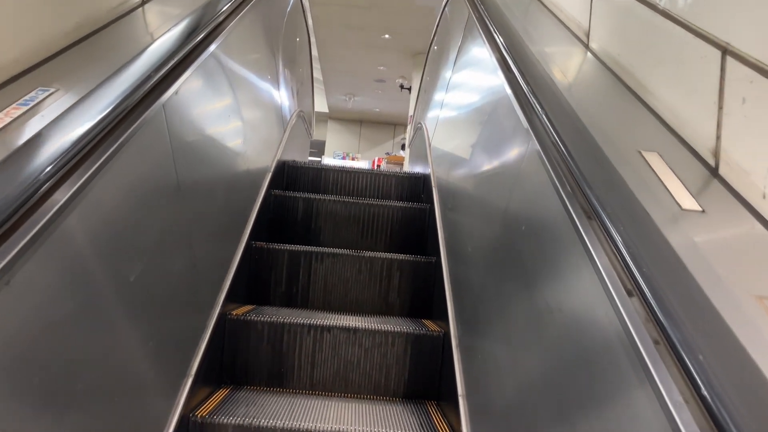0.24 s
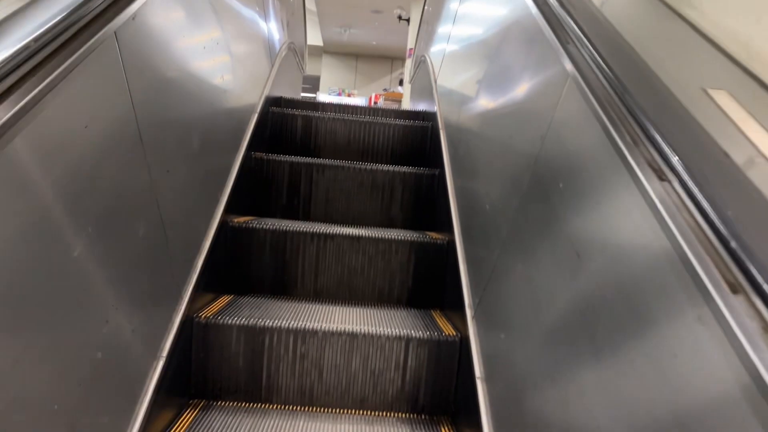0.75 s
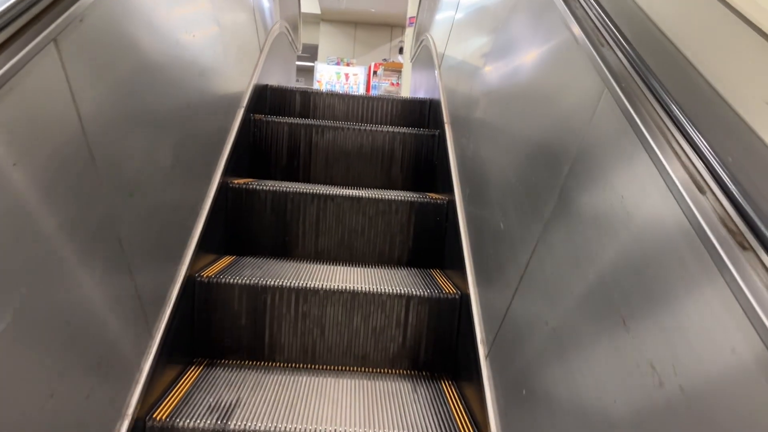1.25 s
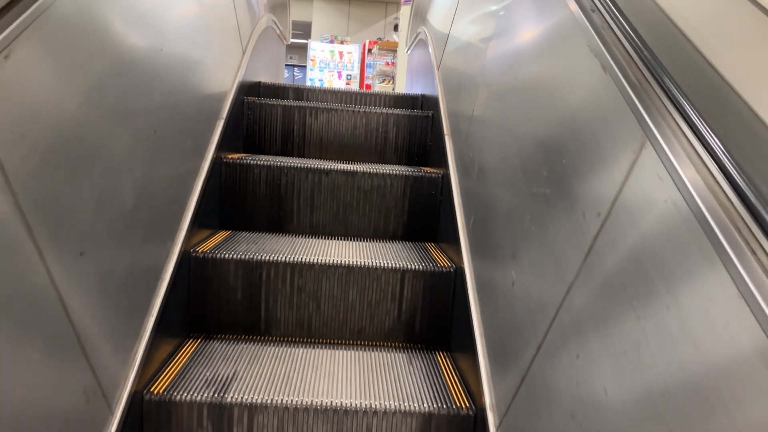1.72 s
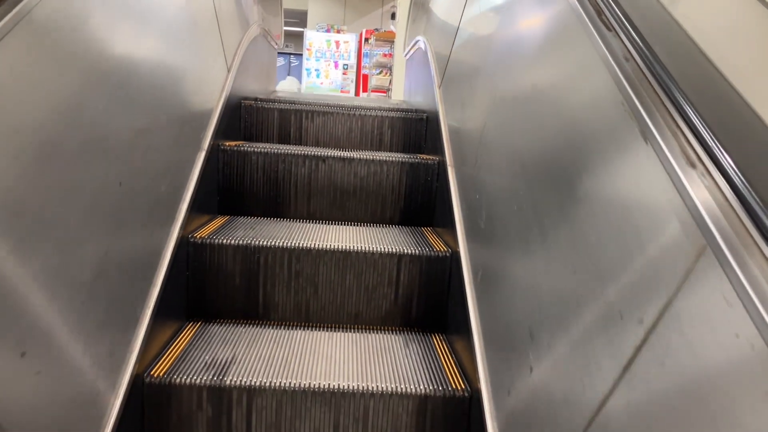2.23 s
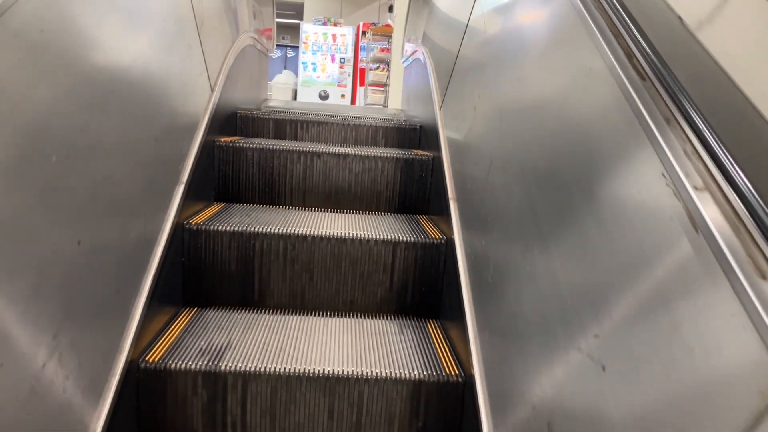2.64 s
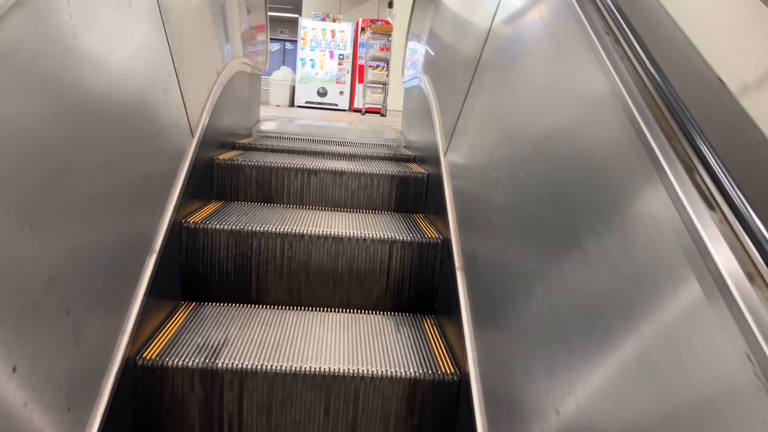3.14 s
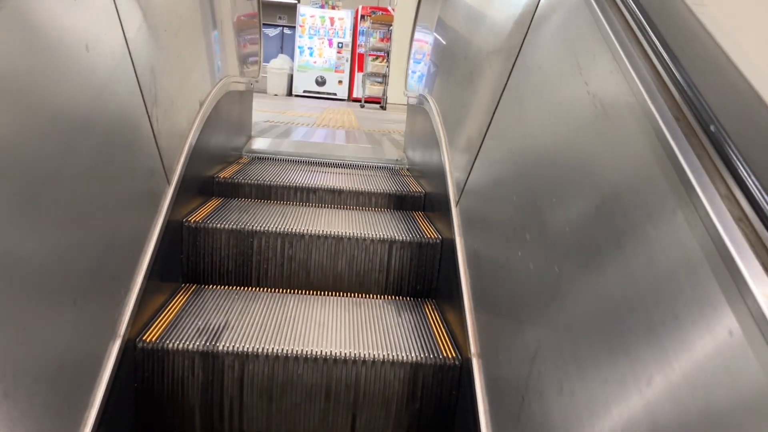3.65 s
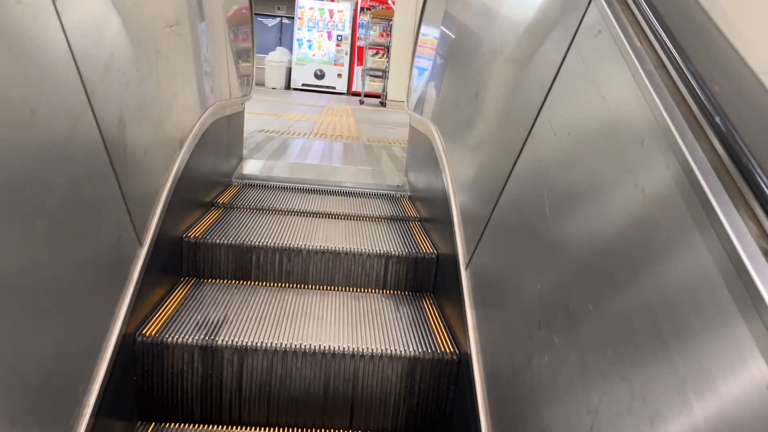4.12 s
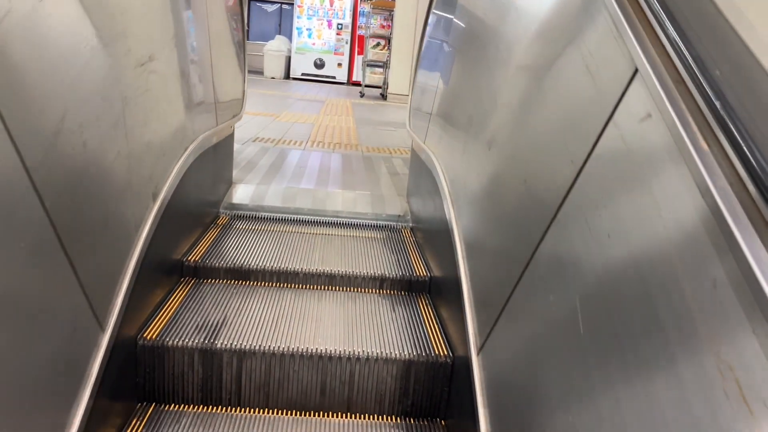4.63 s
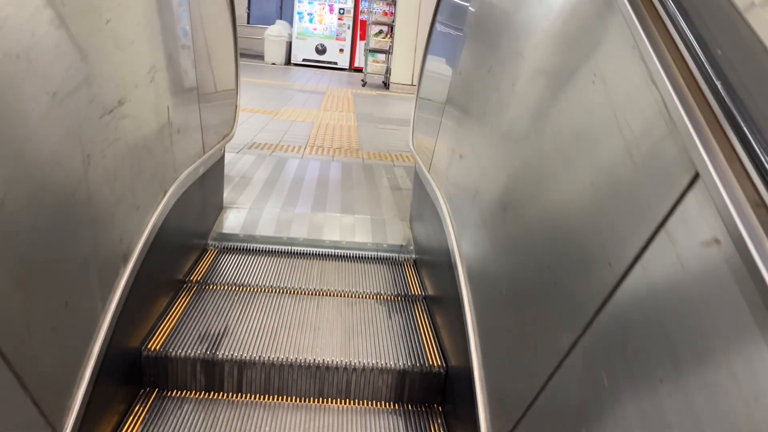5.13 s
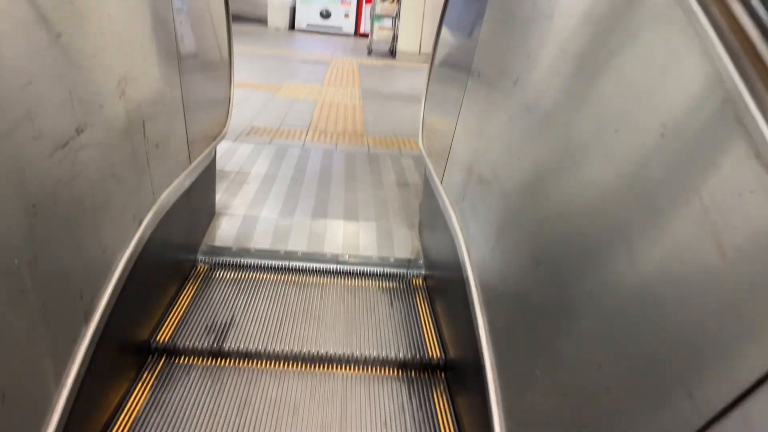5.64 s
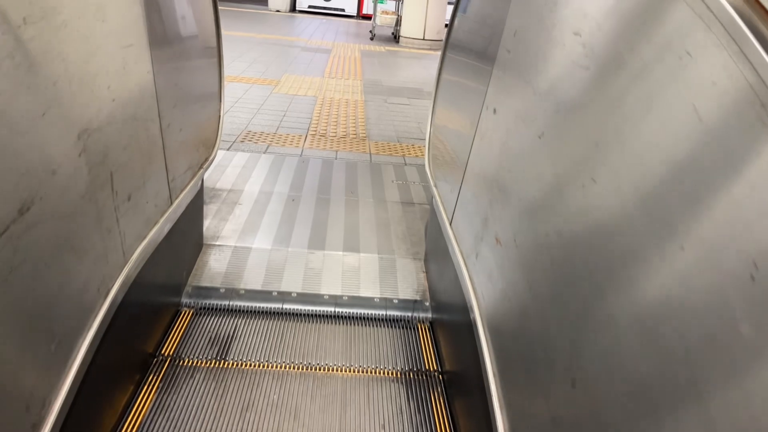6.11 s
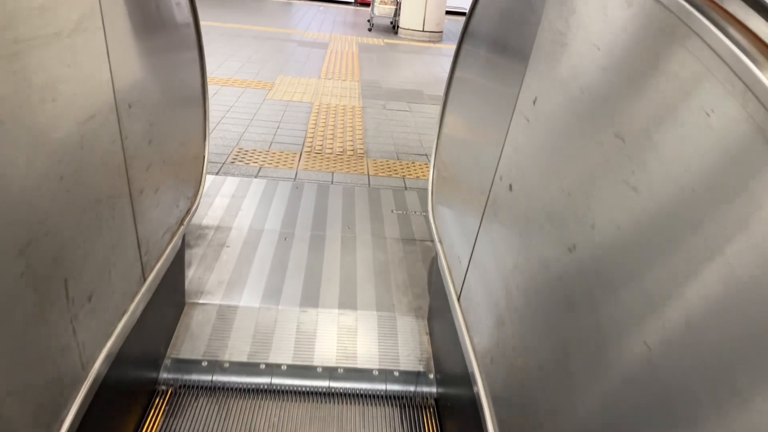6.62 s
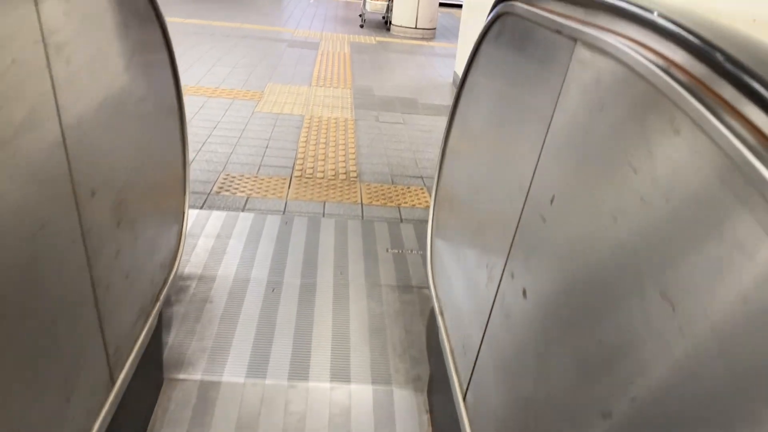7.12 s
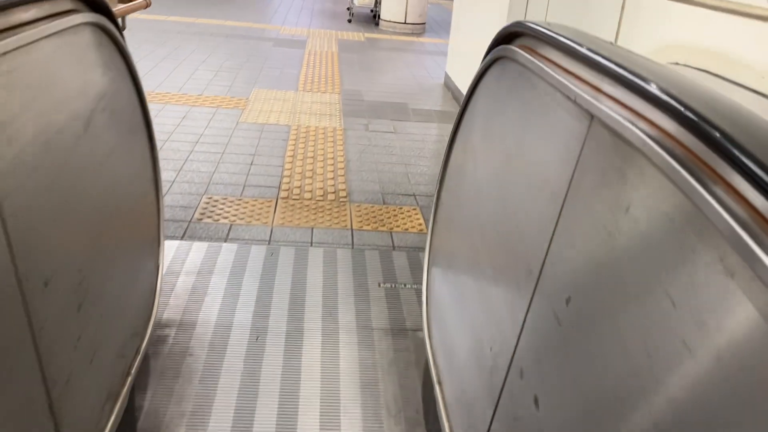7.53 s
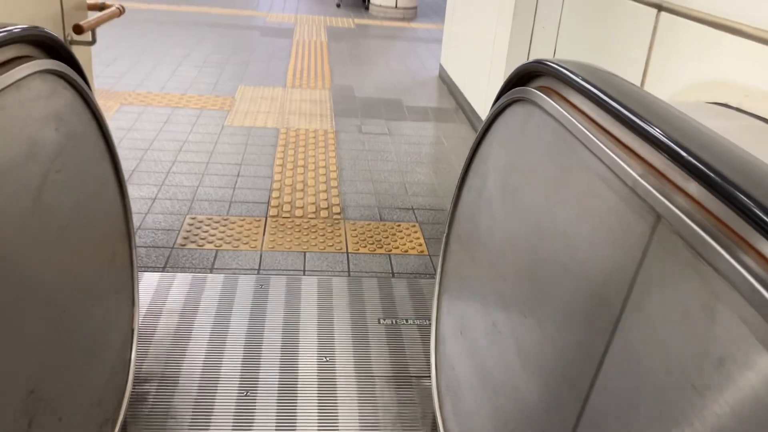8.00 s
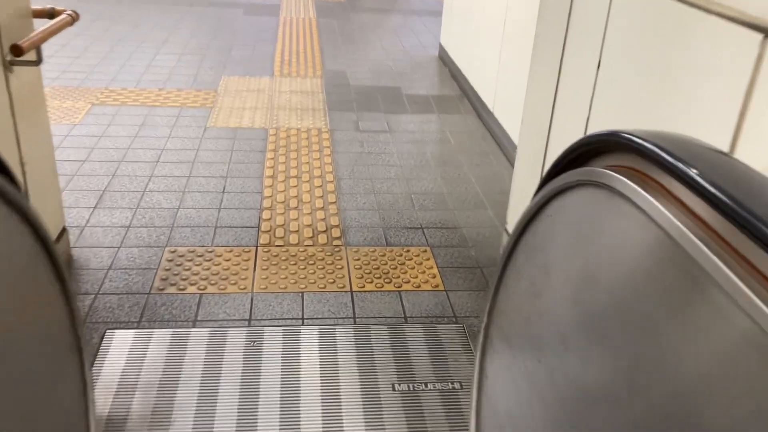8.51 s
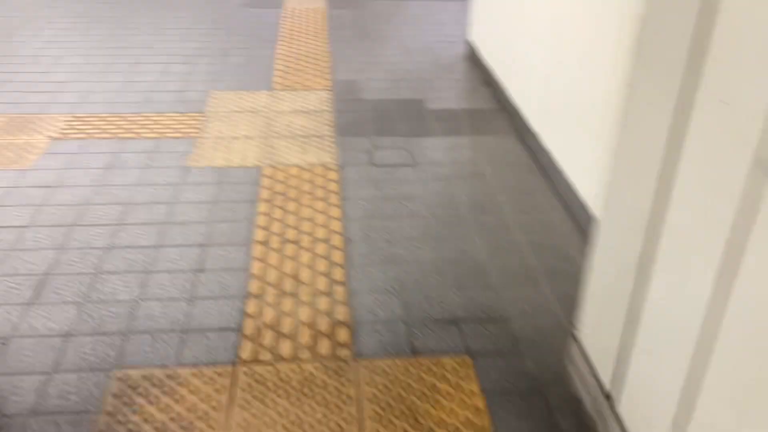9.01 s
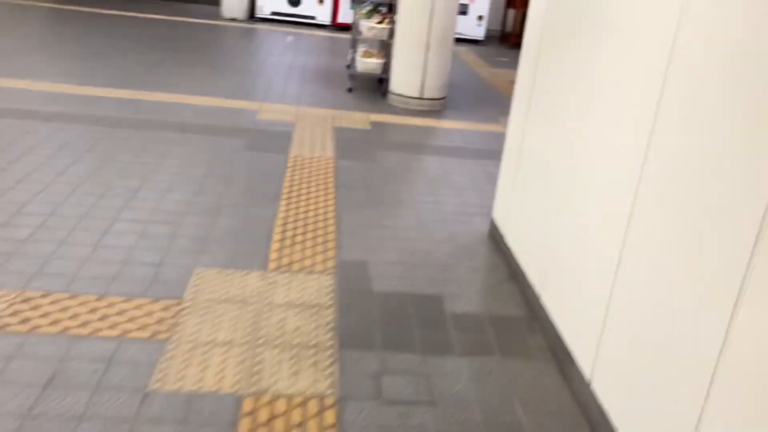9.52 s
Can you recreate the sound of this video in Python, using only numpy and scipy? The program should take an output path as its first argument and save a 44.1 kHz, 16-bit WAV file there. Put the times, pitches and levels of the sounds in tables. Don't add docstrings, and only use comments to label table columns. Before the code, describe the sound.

A close stereo microphone at chest height rides a steel escalator toward a tiled hall for nearly ten seconds. A deep roller rumble runs throughout, swelling gently every 0.85 seconds, with quick faint chain ticks about seven per second and a soft handrail hiss. A hollow knock opens at 0.2, followed by lighter knocks. From about 2.1 the ticks sharpen; at 2.8 and 3.6 steps fold with booms and clacks, while the motor roar and high gear whine draw nearer. A hard metallic clack lands at 5.3. Heavy hollow booms follow at 6.2, with a dry snap, then 7.0 and 7.9, the loudest. Cloth rustles around 8.5, a sole drags, and a gritty scuff rings the plate at 8.75. Smaller scrapes and taps follow at 9.2 to 9.3, as the machinery eases slightly. Short metallic reflections surround the blows.

```python
import sys
import numpy as np
from scipy import signal
from scipy.fft import rfft, irfft
from scipy.io import wavfile
from scipy.ndimage import uniform_filter1d

SR = 44100
rng = np.random.default_rng(int(sys.argv[2]) if len(sys.argv) > 2 else 0)


def linear_from_db(decibels):
    return 10 ** (np.asarray(decibels, float) / 20)


def generate_wav(sig):
    pcm = np.round(np.clip(np.atleast_2d(sig).T, -1, 1) * 32767).astype(np.int16)
    wavfile.write(sys.argv[1], SR, pcm)


N = 429975
STEP_S = .8483
KNOCK_T60, SOFT_KNOCK_HZ = 0.23, 245.4


def evened(x):
    return x / np.sqrt(np.mean(x ** 2) + 1e-20)


def read(points, hz):
    f, value = np.transpose(points)
    return np.interp(np.log(hz + 1), np.log(f + 1), value)


def add(mix, s, sound):
    part = mix[:, round(s * SR):][:, :sound.shape[1]]
    part += sound[:, :part.shape[1]]


def bump(t, centre_s, wide_s):
    return np.exp(-((t - centre_s) / wide_s) ** 2)


def strike(hz, t60, rise_s, octaves, tilt_db, bounce, count):
    t = np.arange(int((.8 * t60 + .03) * SR)) / SR
    place, life, *turn = rng.uniform(-1.05, 1, (4, count, 1))
    if count > 9:
        place = np.linspace(-1, 1, count)[:, None] + place / count
    place = octaves * place * (np.arange(count)[:, None] > 0)
    mode_t60 = t60 * (1 + 0.49 * life) / 2 ** (.5 * place)
    decay = linear_from_db(tilt_db * place) * np.exp(-np.log(1000) * t / mode_t60)
    phase = 2 * np.pi * (hz * 2 ** place * t + .5 * np.array(turn))
    ring = (decay * np.sin(phase)).sum(1)
    fade = signal.windows.tukey(2 * len(t), .3)[len(t):]
    ring = ring * (1 - np.exp(-t / rise_s)) * fade
    late = int(rng.uniform(.006, .014) * SR)
    ring[:, late:] += bounce * ring[:, :-late]
    return ring / abs(ring).max(axis=1, keepdims=True)


def bed(shape, level_db, size, patchy_db, flicker_db):
    # centre in Hz, width in Hz, lift in dB.
    truss = [(57.7, 15.2, 15), (99, 12.5, 7.5), (118, 8.4, -1.5), (140, 40, 1), (226, 37.4, 10.5),
             (256.6, 15, 4), (293.3, 25, 7.5), (330.4, 11, 4), (383, 30, 6), (464, 35, 8.5), (860, 23, 3),
             (1368, 22, 0.5), (2010, 25, 2), (1680, 20, 1)]
    hop = size // 4
    frames, hz = N // hop + 5, np.fft.rfftfreq(size, 1 / SR)
    z = rng.standard_normal((frames, len(hz), 5), dtype=np.float32).T
    patches = evened(uniform_filter1d(uniform_filter1d(z[4], 6, 0), 6, 1))
    flicker = evened(uniform_filter1d(rng.standard_normal(frames), 5))
    rings_db = sum(db / (1 + (2 * (hz - f) / width) ** 2) for f, width, db in truss)
    steady_db = (read(shape, hz) + rings_db)[:, None]
    colour = linear_from_db(steady_db + patchy_db * patches + flicker_db * flicker)
    spectrum = (z[:2] + 1j * z[2:4]) * colour
    noise = signal.istft(spectrum, nperseg=size, noverlap=size - hop)[1][:, :N]
    return evened(noise) * linear_from_db(level_db)


def rollers(t, far, leave_db):
    # frequency in Hz, level in dB per Hz.
    rumble = [(12, -40), (20, -18), (64, -5.5), (112, 0), (147, 2), (186, -10), (243, -10), (323, -10),
              (512, -20.5), (700, -16), (910, -54), (1540, -120)]
    swell_db = 1.5 * np.cos(2 * np.pi * (t - 0.49) / STEP_S)
    level_db = -31.5 + swell_db - 0.25 * far + 0.35 * leave_db
    return bed(rumble, level_db, size=4096, patchy_db=2.0, flicker_db=-1.34)


def steps():
    # start in seconds, boom peak in dB, boom in Hz, knock peak in dB, knock in Hz.
    folds = [
        (0.232, -38, 110, -18.5, 223.8),
        (2.775, -24, 112, -18.5, 187.8),
        (3.63, -20, 105, -20, 222.6),
        (4.53, -38, 110, -24.5, 271),
        (5.326, -20.5, 140, -22.5, 317.4),
        (6.163, -11.5, 138.4, -18, 226),
        (7.023, -11, 122, -21, 184),
        (7.854, -9.5, 127, -14, 235.5),
        (8.727, -12.5, 131, -25, 240),
        (9.534, -40, 109, -27.5, 259.5),
    ]
    # start in seconds, peak in dB, pitch in Hz.
    landings = [(0.921, -25, 99), (1.62, -23, 100), (2.206, -23, 102), (2.721, -25, 111.7),
                (2.978, -28, 73), (3.144, -24, 139), (3.818, -23.5, 153), (4.24, -35, 119),
                (4.845, -22, 102.6), (5.664, -24, 74.5), (5.827, -22, 91.5), (6.355, -25, 117),
                (6.7, -17.5, 94), (6.926, -16.5, 106), (7.36, -17, 93), (7.636, -18.5, 119),
                (8.07, -21.5, 106), (8.234, -15, 166), (8.925, -18, 115)]
    # start in seconds, peak in dB, pitch in Hz.
    settlings = [(0.602, -28.5, 434), (1.418, -25.5, 231.5), (1.822, -30.5, 321), (1.984, -27, 230),
                 (2.252, -24, 239), (2.906, -31, 226), (2.993, -24, 289.4), (3.515, -27.5, 288.6),
                 (3.98, -31, 278), (4.875, -32.5, 230), (5.242, -25.5, 363), (5.52, -27, 226),
                 (5.624, -22.5, 300), (6.467, -28, 278), (6.48, -20.5, 271.6), (6.515, -23, 339),
                 (6.786, -27.5, 397), (6.927, -26, 269), (7.017, -17.5, 397.4), (7.145, -28.5, 216),
                 (7.361, -26, 231.5), (8.811, -24, 229), (7.636, -20.5, 269.4), (7.821, -25, 298),
                 (8.067, -26, 360.4), (8.207, -20.5, 279), (8.348, -29, 220.4), (8.912, -23.5, 396),
                 (9.028, -23, 325), (9.614, -28.5, 292)]
    knock_late_s = 0.00796
    out = np.zeros((2, N))
    booms = [(s, db, hz, 0.13) for s, db, hz, _, _ in folds]
    booms += [(s, db, hz, 0.16) for s, db, hz in landings]
    knocks = [(s + knock_late_s, db, hz, 0.28) for s, _, _, db, hz in folds]
    knocks += [(s, db, hz, KNOCK_T60 * SOFT_KNOCK_HZ / hz) for s, db, hz in settlings]
    for s, db, hz, t60 in booms:
        add(out, s, linear_from_db(db - 5.0) * strike(hz, t60, 0.0015, 0.324, 0, 0, count=3))
    for s, db, hz, t60 in knocks:
        add(out, s, linear_from_db(db) * strike(1.08 * hz, t60, 0.00064, 0.329, -5.5, 0.44, count=10))
    return out


def clacks():
    # start in seconds, peak in dB, tilt in dB per octave, t60 in seconds.
    blows = [(0.243, -25, -4, 0.073), (2.772, -22, -3.5, 0.18), (3.64, -24, -8, 0.047),
             (5.326, -15, -6, 0.071), (6.163, -22.5, -4, 0.14), (7.027, -15, -2.5, 0.046),
             (7.854, -21, -13, 0.58), (8.067, -27, -9, 0.028), (8.207, -37, -1, 0.07),
             (8.727, -19.5, -8.5, 0.081), (8.786, -29, -2, 0.034), (8.912, -35, -27, 0.048),
             (9.24, -32.5, -2, 0.22)]
    out = np.zeros((2, N))
    dull = signal.butter(3, 1900, fs=SR, output="sos")
    for s, db, tilt_db, t60 in blows:
        blow = strike(950, 1.12 * t60, 0.0011, 1.75, tilt_db, 0.78, count=30)
        add(out, s, linear_from_db(db) * signal.sosfilt(dull, blow))
    return out


def side_panel():
    # start in seconds, peak in dB, pitch in Hz, t60 in seconds.
    tones = [
        (6.105, -43, 865, .3),
        (6.71, -41, 860, .35),
    ]
    out = np.zeros((2, N))
    for s, db, hz, t60 in tones:
        add(out, s, linear_from_db(db) * strike(hz, t60, .012, 0.025, 0, 0, count=2))
    return out


def chain():
    # start in seconds, peak in dB, pitch in Hz, ring in dB.
    links = [(0.436, -32, 1220, -7), (0.561, -32, 1080, -5), (1.968, -36, 970, -7), (2.125, -24.5, 860, -5),
             (2.275, -32, 920, -6), (2.687, -30, 930, -6), (2.973, -29, 882, -8), (3.125, -31, 970, -3),
             (3.258, -31.5, 890, -6), (3.404, -25.5, 933, 4), (3.54, -26, 908, -13), (3.828, -33, 900, -14),
             (3.966, -26.5, 950, -10), (4.109, -30, 912, -8), (4.255, -27.5, 1250, -7),
             (4.393, -30.5, 1130, -5), (4.532, -27, 917, -12), (4.675, -27, 956, -1.5),
             (4.818, -29.5, 940, -6), (5.103, -30, 996, -5), (5.521, -25, 900, -1.5), (5.674, -30, 900, -4),
             (6.364, -29.5, 1150, -1), (6.511, -30.5, 890, -2), (6.642, -30.5, 985, -3),
             (6.918, -29, 1050, -3), (7.215, -29.5, 1186, -2.5), (7.356, -27.5, 1147, -5),
             (8.061, -37, 950, -7), (9.061, -28.5, 860, -4)]
    # start in seconds, peak in dB, pitch in Hz, rattle in dB.
    loose_taps = [(0.069, -35, 1120, -10), (1.073, -36, 1104, -17), (1.497, -32, 920, -20),
                  (1.774, -38, 930, -8), (1.816, -28.5, 1105, -4), (2.012, -31, 975, -5),
                  (2.915, -33, 1440, -13), (3.51, -31, 1000, -2), (3.741, -34, 1346, -4),
                  (4.472, -30, 916, -15), (5.327, -22, 1023, -15), (6.078, -32, 940, 3.5),
                  (6.162, -26.5, 904, 1), (6.47, -34, 926, -2), (6.688, -29.5, 992, -18),
                  (7.019, -26, 863, -15), (7.762, -35, 990, -9), (8.042, -33, 1030, -3),
                  (8.786, -27.5, 730, -1), (8.837, -33.5, 767, -2), (9.026, -34, 880, 1.5),
                  (9.24, -30, 764, -14), (9.292, -37, 1210, -2), (9.727, -34, 597, -17)]
    gap, link_at_s = STEP_S / 6, 2.13
    link_t60, rattle_db, tap_ring_db = 0.08, -7.5, -5.5
    out, rings = np.zeros((2, 2, N))
    hard = np.array(links)[:, 0]
    soft = [s for s in np.arange(link_at_s % gap, N / SR, gap) if abs(hard - s).min() > gap / 3]
    rows = [(*row, rattle_db) for row in links]
    rows += [(s, db, hz, tap_ring_db, upper_db) for s, db, hz, upper_db in loose_taps]
    for s, (a, b, c) in zip(soft, rng.uniform(-0.975, 1, (len(soft), 3))):
        rows.append((s + .005 * a, -36.5 + 3.5 * b, 957 * (1 + 0.14 * c), tap_ring_db, rattle_db))
        knock = strike(SOFT_KNOCK_HZ, KNOCK_T60, 0.0014, 0.472, 0, 0.51, count=6)
        add(out, s, linear_from_db(-37 + 3.7 * a) * knock)
    for s, db, hz, ring_db, upper_db in rows:
        ring = strike(hz, 0.8 * link_t60, 0.001, .22, 0, 0.3, count=2)
        tick = strike(946, 0.6 * link_t60, 0.0011, 0.711, 0, 0.62, count=10)
        rattle = strike(1653, 0.57 * link_t60, 0.0011, 0.31, 0, 0.45, count=5)
        add(rings, s, linear_from_db(db + ring_db) * ring)
        add(out, s, linear_from_db(db - 2.5) * tick)
        add(out, s, linear_from_db(db + upper_db - 3.5) * rattle)
    return out, rings


def shoes():
    # start in seconds, peak in dB, bright part in dB.
    scuffs = [(0.7456, -41.5, -5), (1.815, -44, -18), (2.5526, -44, -12), (2.782, -41, 0),
              (2.7994, -38.5, -10), (5.0754, -43, -16), (5.3303, -44, 2), (7.0304, -42, -5),
              (7.5911, -51, -19), (8.745, -28.5, -6.5), (9.061, -43.5, -4), (9.2399, -40, -18),
              (9.258, -42, 0), (9.289, -41, -9), (9.4884, -51, 3), (9.5213, -44, -12), (9.6106, -46, -22)]
    # start in seconds, peak in dB, pitch in Hz, t60 in seconds.
    plate = [(2.782, -33, 1870, 0.1), (2.782, -35.5, 4500, .09), (2.783, -32, 7100, 0.13),
             (8.7448, -27, 4450, 0.027), (8.7455, -34, 5900, .05), (8.787, -31.5, 2100, .04),
             (8.787, -36, 5500, 0.027), (9.24, -38, 3360, .04), (9.258, -40, 2300, 0.04),
             (9.292, -37, 2300, .035), (9.2914, -40, 4300, .04), (6.163, -34, 2180, 0.064),
             (5.33, -35, 2600, 0.098), (7.03, -37, 2900, 0.05)]
    # start in seconds, peak in dB, t60 in seconds, lowest Hz.
    snaps = [(6.162, -22, 0.0069, 11000),
                                                                                                      (8.7869, -29.5, 0.031, 4500),
                                                                                                      (8.4455, -40, .05, 9000),
                                                                                                      (8.8785, -45, .05, 9500),
                                                                                                      (9.2405, -43, 0.037, 6000),
                                                                                                      (9.2577, -45, 0.06, 9500),
                                                                                                      (9.2756, -42, 0.08, 9500),
                                                                                                      (9.2914, -43, .05, 7000)]
    # start in seconds, peak in dB, pitch in Hz.
    thuds = [(0.24, -27, 63), (0.58, -27.5, 70), (2.86, -26, 55), (4.42, -26, 65.4), (5.35, -32, 59.6),
             (9.38, -28, 68.3)]
    out, t = np.zeros((2, N)), np.arange(int(.12 * SR)) / SR
    dull = signal.butter(2, [1800, 5200], "bandpass", fs=SR, output="sos")
    bright = signal.butter(3, [5500, 9500], "bandpass", fs=SR, output="sos")
    rise = 1 - np.exp(-t / 0.00086)
    for s, db, top_db in scuffs:
        grit = rng.standard_normal((2, len(t)))
        tone = evened(signal.sosfilt(dull, grit)) + linear_from_db(top_db) * evened(signal.sosfilt(bright, grit))
        add(out, s, tone * linear_from_db(db - 60 * t / 0.065) * rise)
    for s, db, hz, t60 in plate:
        add(out, s, linear_from_db(db) * strike(hz, 0.81 * t60, 0.00018, .42, 0, 0.25, count=11))
    for s, db, t60, low_hz in snaps:
        thin = signal.butter(3, low_hz, "highpass", fs=SR, output="sos")
        snap = evened(signal.sosfilt(thin, rng.standard_normal((2, len(t)))))
        add(out, s, snap * linear_from_db(db - 60 * t / t60) * rise)
    for s, db, hz in thuds:
        add(out, s, linear_from_db(db) * strike(hz, 0.22, 0.014, 0.31, 0, 0, count=3))
    return out


def comb_teeth():
    # start in seconds, peak in dB, pitch in Hz, t60 in seconds.
    tooth_rings = [(5.327, -19, 1170, 0.031), (5.333, -42, 3200, .05), (5.35, -42, 3500, .03),
                   (8.788, -25.5, 830, 0.022), (9.241, -41, 3250, .05), (9.257, -35, 2070, .04),
                   (9.283, -33, 2400, .04), (9.291, -28.5, 1880, .045), (9.291, -40, 4600, .03),
                   (3.541, -34, 1600, .04), (5.336, -24, 680, 0.054), (5.342, -30, 1250, .04),
                   (7.592, -41, 3000, .03), (9.728, -35, 670, .04), (9.241, -32, 750, 0.054),
                   (9.292, -34.5, 1100, .03), (3.405, -30, 900, .09), (4.678, -30.5, 950, .09),
                   (3.97, -30.5, 680, 0.081), (6.165, -31, 1500, .09), (6.175, -34, 1900, .09),
                   (2.785, -30, 1900, 0.14), (5.345, -27.5, 478, .07)]
    out = np.zeros((2, N))
    for s, db, hz, t60 in tooth_rings:
        add(out, s, linear_from_db(db) * strike(hz, t60, 0.0008, .14, 0, .15, count=3))
    return out


def drive(t, far, leave_db, drag):
    # frequency in Hz, level in dB per Hz.
    roar = [(240, -50), (400, -22), (521, -8.5), (1240, -6.5), (1390, -7), (2060, -11), (2460, -15),
            (2770, -16), (5000, -27), (6500, -47), (11000, -120)]
    # frequency in Hz, level in dB.
    whine = [(2000, -60), (2550, -14), (2770, 0), (3000, -14), (3250, -22), (3480, -6), (3700, -22),
             (4500, -60)]
    shade = bump(t, 9, 0.12)
    roar_db = -43 - 1.1 * far + leave_db - 0.5 * drag - 2.5 * shade
    whine_db = -53 - 38 * far + 2 * leave_db
    out = bed(roar, roar_db, size=1024, patchy_db=1.5, flicker_db=0.57)
    return out + bed(whine, whine_db, size=1024, patchy_db=2.8, flicker_db=1.6)


def handrail(t, drag):
    # frequency in Hz, level in dB per Hz.
    hiss = [(2500, -20), (4000, -9.5), (6000, -6), (9000, -8), (12000, -10.5), (13500, -16), (14500, -15),
            (15600, -20), (15800, -45)]
    off_bend = 1 - bump(t, 4.87, 2.65)
    rub_db = -53.5 - 3.5 * off_bend + 5 * drag
    return bed(hiss, rub_db, size=512, patchy_db=2.0, flicker_db=0.45)


def cloth():
    # centre in seconds, rms in dB, half length in seconds.
    rustles = [(0.75, -60, .02), (3.84, -62, .015), (3.87, -65, .015), (3.915, -64, .015),
               (3.965, -51, .018), (4.15, -66, .03), (8.5, -55, .06), (8.62, -62, .07), (8.9, -62, 0.035)]
    t = np.arange(N) / SR
    high = signal.butter(4, 9800, "highpass", fs=SR, output="sos")
    puffs = sum(linear_from_db(db) * bump(t, s, half_s) for s, db, half_s in rustles)
    return puffs * evened(signal.sosfilt(high, rng.standard_normal((2, N))))


def hall(x):
    # frequency in Hz, t60 in seconds.
    decay = [(80, 0.73), (250, 0.35), (1000, 0.3), (4000, 0.26), (12000, 0.027)]
    taps = np.zeros((2, SR // 2))
    slots = np.arange(200, SR // 2 - 20, 20)
    at = slots + rng.integers(0, 20, (2, len(slots)))
    np.put_along_axis(taps, at, rng.choice([-1., 1.], at.shape), 1)
    hz, t, z = signal.stft(taps, SR, nperseg=512)
    fall = linear_from_db(-60 * t / read(decay, hz)[:, None])
    tail = signal.istft(z * fall, SR, nperseg=512)[1]
    return signal.fftconvolve(x[None], tail / np.linalg.norm(tail[0]), axes=1)[:, :N]


def ports(pair, treble_likeness):
    # frequency in Hz, likeness from 0 to 1.
    likeness = [(60, .99), (100, .96), (300, .9), (420, .6), (600, .42), (1000, .5), (1600, .25),
                (2500, .12), (5200, .15), (6000, .5), (7000, .7), (7600, 1)]
    # frequency in Hz, phase in rad.
    lead = [(60, 0), (300, 0), (500, .5), (1000, .7), (1500, 1.2), (2000, 1.5), (5000, 1.5)]
    # frequency in Hz, left over right in dB.
    balance = [(60, -2.3), (300, -3.3), (1000, -2.4), (2500, -2), (4000, 0), (6000, .6), (8000, 0)]
    comb_from_hz, comb_step_hz = 4650, 1690
    edge_hz = 15780
    hz = np.fft.rfftfreq(N, 1 / SR)
    same = read(likeness, hz)
    same = np.where(hz > comb_from_hz, np.minimum(same, treble_likeness), same)
    lean = linear_from_db(.5 * read(balance, hz)) ** np.array([[1], [-1]])
    lag = np.maximum(read(lead, hz), np.pi * (hz - comb_from_hz) / comb_step_hz)
    left, other = rfft(pair)
    right = same * left * np.exp(-1j * lag) + np.sqrt(1 - same ** 2) * other
    return irfft(np.array([left, right]) * lean * (hz < edge_hz), N)


def scene():
    # time in seconds, nearness from 0 to 1.
    near = [(0, 0.3), (1.0, 0.1), (2.4, 0.56), (3.5, 0.78), (5.3, 1.0), (7.4, 0.86), (9.2, 0.97),
            (9.75, 0.9)]
    t = np.arange(N) / SR
    far = 1 - np.interp(t, *np.transpose(near))
    leave_db = -5.5 * np.maximum(t - 8.95, 0)
    drag = bump(t, 8.66, 0.43)
    steady = rollers(t, far, leave_db) + drive(t, far, leave_db, drag) + handrail(t, drag) + cloth()
    ticks, rings = chain()
    hits = steps() + clacks() + side_panel() + ticks + shoes()
    hits += linear_from_db(-11) * hall(hits[0]) + rings + comb_teeth()
    return ports(steady, 1) + ports(hits, .985)


def low_pass(x):
    return signal.sosfilt(signal.butter(12, 16490, fs=SR, output="sos"), x)


def record(dry):
    cut = signal.sosfilt(signal.butter(2, 30, "highpass", fs=SR, output="sos"), dry)
    ceiling = .42
    return low_pass(ceiling * np.tanh(cut / ceiling))


dry = scene()
out = record(dry)
generate_wav(out)
```